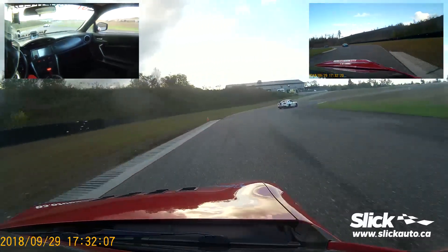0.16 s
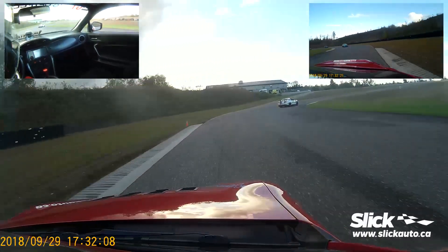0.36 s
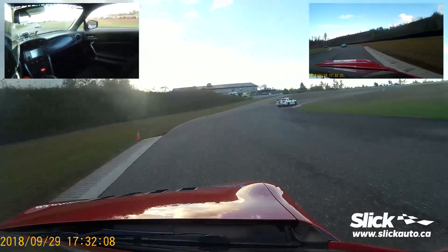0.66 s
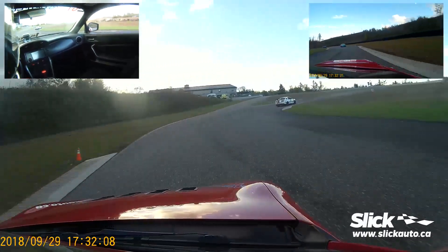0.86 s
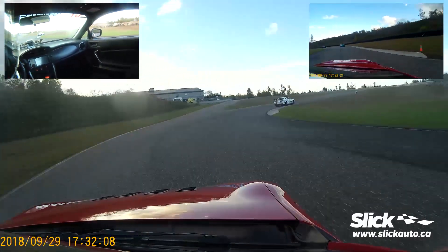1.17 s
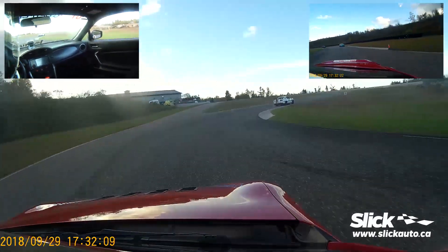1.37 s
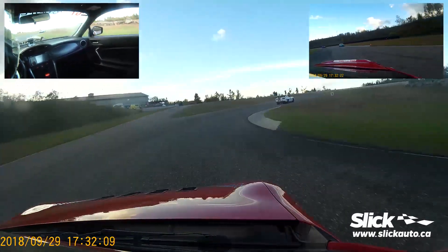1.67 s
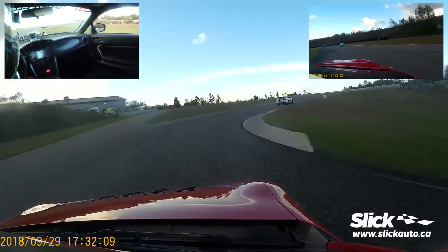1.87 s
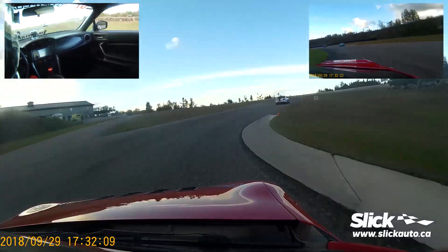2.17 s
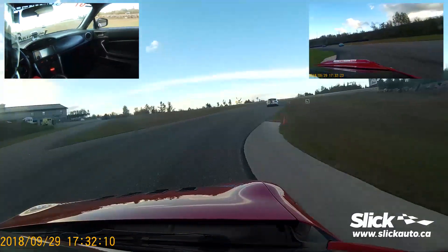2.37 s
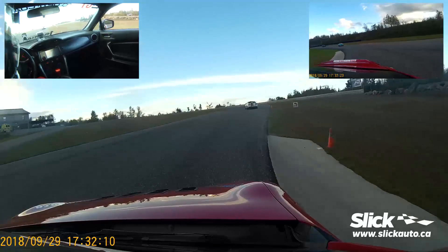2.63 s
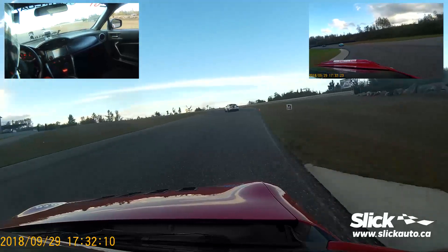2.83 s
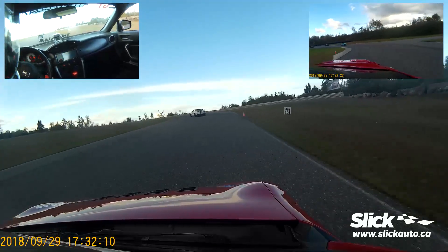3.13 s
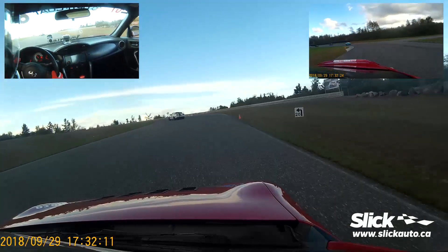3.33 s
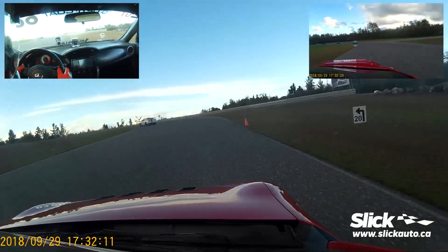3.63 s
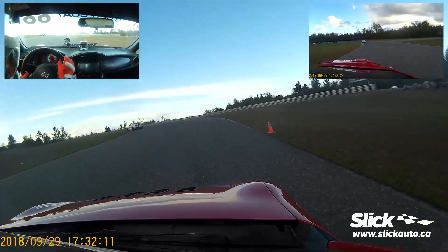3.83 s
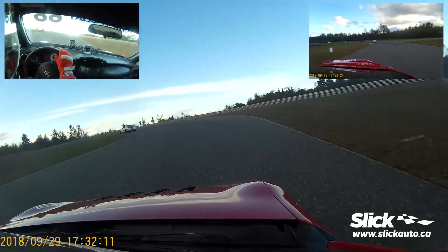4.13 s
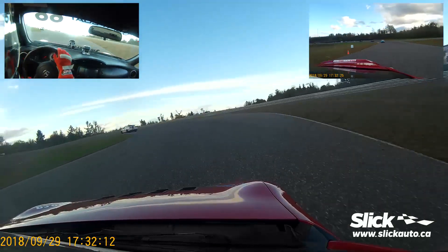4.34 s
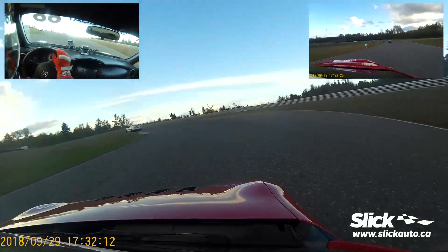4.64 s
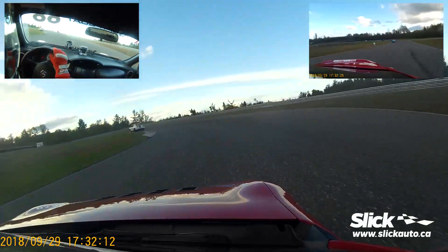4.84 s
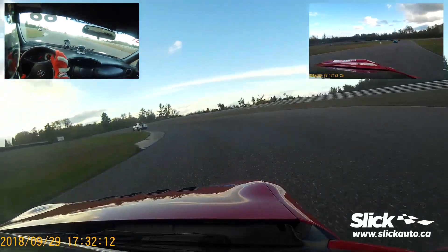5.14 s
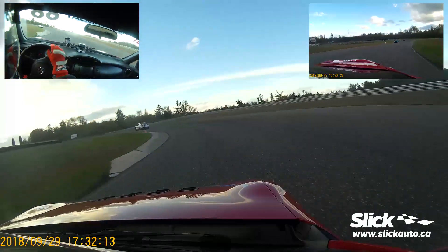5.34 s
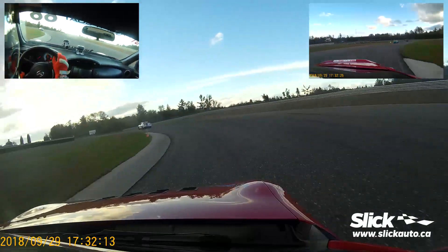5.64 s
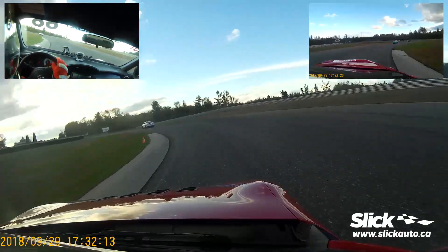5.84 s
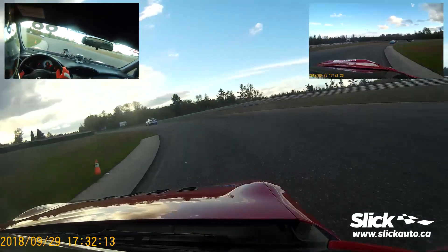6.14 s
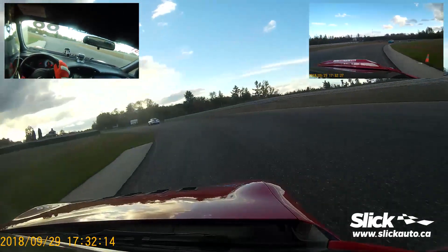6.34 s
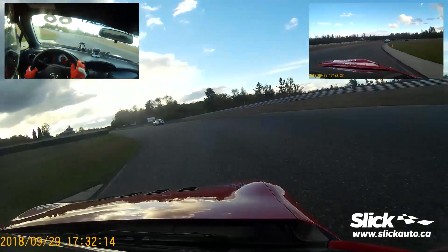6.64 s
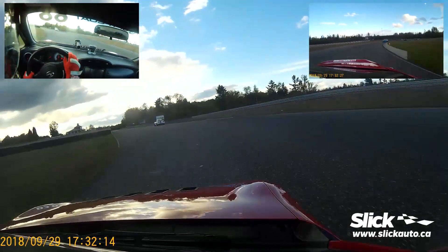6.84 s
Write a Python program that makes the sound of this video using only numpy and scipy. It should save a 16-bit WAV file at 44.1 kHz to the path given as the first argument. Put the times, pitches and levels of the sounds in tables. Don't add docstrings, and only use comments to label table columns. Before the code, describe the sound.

Inside a car lapping a circuit, a smooth six-cylinder engine booms and dips with the pedal over tyre roar, floor rumble and wind, finally pulling hard.

```python
import sys
import numpy as np
from scipy import signal
from scipy.io import wavfile
from scipy.ndimage import uniform_filter1d

SR = 44100
rng = np.random.default_rng(int(sys.argv[2]) if len(sys.argv) > 2 else 0)


def invert_db(level):
    return 10 ** (np.asarray(level, dtype=float) / 20)


def int16_out(signal):
    q = np.round(np.clip(np.atleast_2d(signal).T, -1, 1) * 32767)
    wavfile.write(sys.argv[1], SR, q.astype(np.int16))


N = 308700
T = np.arange(N) / SR
CYLINDERS = 6
LIFT_S = 0.08
# (pitch [Hz], width [Hz], level [dB])
PANEL = [(866, 26, -5.5), (1330, 40, -14)]


def evened(x):
    return x / np.sqrt(np.mean(x ** 2) + 1e-20)


def read(points, hz):
    f, value = np.transpose(points)
    return np.interp(np.log(hz + 1), np.log(f + 1), value)


def curves(rows):
    s, *columns = np.transpose(rows)
    return [np.interp(T, s, c) for c in columns]


def spells(rows, rest_db, fall_s):
    power = invert_db(rest_db) ** 2 + np.zeros(N)
    for start, end, db, rise in rows:
        shape = np.clip(np.minimum((T - start) / rise, 1 + (end - T) / fall_s), 0, 1)
        power += (invert_db(db) * shape ** 2) ** 2
    return 10 * np.log10(power)


def drift(seconds):
    steps = rng.standard_normal(N // 256 + 2)
    span = max(round(seconds * SR / 256), 1)
    smooth = uniform_filter1d(uniform_filter1d(steps, span), span)
    return np.interp(np.arange(N) / 256, np.arange(len(steps)), evened(smooth))


def resonate(x, hz, width):
    turn = np.exp(2j * np.pi * np.cumsum(hz * np.ones(N)) / SR)
    r = np.exp(-np.pi * width / SR)
    return 2 * (turn * signal.lfilter([1 - r], [1, -r], x / turn)).real


def fuzzy(hz, width):
    once = resonate(rng.standard_normal(N), hz, width)
    return evened(resonate(once, hz, width))


def noise(shape, size, patchy_db, flicker_db):
    frames, hz = 4 * N // size + 5, np.fft.rfftfreq(size, 1 / SR)
    a, b, patches = rng.standard_normal((frames, len(hz), 3)).T
    patches = evened(uniform_filter1d(uniform_filter1d(patches, 8, 0), 10, 1))
    flicker = evened(uniform_filter1d(rng.standard_normal(frames), 4))
    beyond_db = -9 * np.log2(np.maximum(hz / shape[-1][0], 1))
    spectrum_db = (read(shape, hz) + beyond_db)[:, None]
    z = (a + 1j * b) * invert_db(spectrum_db + patchy_db * patches + flicker_db * flicker)
    return evened(signal.istft(z, nperseg=size, noverlap=3 * size // 4)[1][:N])


def car_ahead():
    # (time [s], firing rate [Hz], level [dB])
    lead_car = [
        (0, 259.5, -62),
        (.55, 260, -44),
        (1.05, 274, -78.5),
        (1.5, 276, -50),
        (1.9, 275, -50.5),
        (2.5, 286.8, -48),
        (2.75, 283.7, -50),
        (3, 268, -67),
    ]
    hz, db = curves(lead_car)
    db = db - 30 * np.clip(T - lead_car[-1][0], 0, 2)
    phase = 2 * np.pi * np.cumsum(hz) / SR + 0.44 * drift(.04)
    return np.sqrt(2) * invert_db(db - 2.0 + 0.5 * drift(.05)) * np.sin(phase)


def stones():
    # (time [s], peak level [dB], length [s], lowest pitch [Hz])
    hits = [(.567, -58, .005, 2000), (1.309, -59, .01, 2000), (1.584, -57, .012, 2000),
            (1.857, -61, .006, 4000), (2.6, -63, .02, 2000), (3.618, -56, .01, 4000),
            (4.3235, -50, .006, 2200), (4.3295, -48.5, .009, 1900), (5.337, -58, .01, 3000),
            (5.64, -62, .015, 2500), (6.993, -47, .01, 2000)]
    out = np.zeros(N + SR)
    t = np.arange(4000) / SR
    for s, db, length, low_hz in hits:
        bandpass = signal.butter(1, [low_hz, 9000], "band", fs=SR)
        burst = signal.lfilter(*bandpass, rng.standard_normal(len(t)))
        fade = np.exp(-t / length) * np.minimum(t / .0008, 1)
        out[round(s * SR):][:len(t)] += invert_db(db - 7) * burst * fade
    return out[:N]


def seam_knocks():
    # (time [s], peak level [dB], pitch [Hz])
    seams = [
        (0.025, -56, 430),
        (0.112, -38.5, 800),
        (0.176, -41, 600),
        (0.243, -41, 730),
        (0.556, -31, 396),
        (1.055, -36.5, 433),
        (4.715, -40, 408.7),
    ]
    out = np.zeros(N + SR)
    t = np.arange(4000) / SR
    for s, db, hz in seams:
        out[round(s * SR):][:len(t)] -= invert_db(db - 4.5) * np.sin(2 * np.pi * hz * t) * np.exp(-t * hz / 4.4)
    return out[:N]


def alternator(cycle):
    # (start [s], end [s], level [dB], rise [s])
    whine = [
        (.8, 1.3, -93, .2),
        (1.7, 2.95, -90, .3),
        (3.4, 4.0, -94, .2),
        (3.95, 4.9, -91, .15),
        (5.8, 7.1, -87.5, .4),
    ]
    level_db = spells(whine, -98, fall_s=.3) + 4.5 + 1.6 * drift(.04)
    return invert_db(level_db) * np.sin(24.33 * CYLINDERS * cycle + .9 * drift(.012))


def intake(hz):
    # (start [s], end [s], level [dB], rise [s])
    whistle = [
        (3.45, 3.95, -86, .25),
        (5.95, 6.5, -84, 0.18),
        (6.42, 6.88, -78, 0.17),
    ]
    return invert_db(spells(whistle, -105, fall_s=.2)) * fuzzy(np.minimum(32.05 * hz, 8350), 450)


def trim_rattle(jolt):
    # (pitch [Hz], width [Hz], level [dB])
    trim = [(3360, 390, -3.5), (3700, 490, 7), (4390, 110, -2.5), (4750, 71, -6.5)]
    # (start [s], end [s], level [dB], rise [s])
    rattles = [
        (1.25, 1.9, -76, 0.21),
        (2.5, 2.7, -78, .12),
        (3.96, 4.4, -77, 0.055),
        (4.4, 5.2, -77, 0.23),
        (5.22, 5.42, -73, .08),
        (5.45, 5.62, -73.5, 0.043),
        (6.0, 7.1, -79.5, 0.18),
    ]
    size_db = 1.5 * np.minimum(rng.exponential(1, N), 4) + 1.7 * drift(.012)
    taps = invert_db(size_db) * (rng.random(N) < 6000 / SR) * rng.choice([-1, 1], N)
    ringing = np.zeros(N)
    for hz, wide, db in trim:
        ringing += invert_db(db) / np.sqrt(wide) * resonate(resonate(taps, hz, wide), hz, 1.1 * wide)
    level_db = spells(rattles, -87, fall_s=0.071) + 1.1 * jolt + 0.87 * drift(.03)
    return invert_db(level_db) * evened(ringing)


def wind(roar_db, hz, jolt):
    # (pitch [Hz], level [dB])
    hiss = [(1500, -6), (3000, -4), (5000, -3.5), (7000, -4), (8500, -4), (10000, -6), (12000, -7.5),
            (14500, -10), (16000, -12)]
    level_db = -83.5 + .6 * (roar_db + 60.5) + 0.0515 * (hz - 233)
    level_db += 0.37 * (T - 4)
    return invert_db(level_db + 6.5 + 0.68 * jolt) * noise(hiss, 256, patchy_db=.8, flicker_db=.7)


def body_thump(roar_db, jolt):
    # (pitch [Hz], level [dB per Hz])
    thump = [(4, -8.5), (14, 10), (26, 17.5), (45, 5), (70, -5), (110, -41)]
    level_db = roar_db + 8.5 + 1.9 * jolt + 0.5 * drift(0.033)
    return invert_db(level_db) * noise(thump, 2048, patchy_db=.8, flicker_db=.7)


def tyres(roar_db, jolt):
    # (pitch [Hz], level [dB])
    rumble = [(30, -8), (60, -19), (80, -3), (103, 28), (135, 0.5), (200, 6), (250, 8), (320, 1.5),
              (430, 2.5), (520, -8.5), (700, -40.5)]
    roar = [(300, 0), (500, -2), (900, -2), (1100, -2.5), (1600, -6), (2100, -13), (2400, -19),
            (3000, -19.5), (4000, -24.5), (5200, -28), (6500, -47)]
    scrub = [(250, -7), (400, 1), (500, -1), (690, 5.5), (900, -3), (1100, -10.5), (1800, -52.5)]
    # (start [s], end [s], level [dB], rise [s])
    corners = [
        (-.1, 2.76, 3.18, 0.11),
        (1.4, 2.2, 1.8, 0.33),
    ]
    out = invert_db(roar_db + 11.5 + 1.6 * jolt) * noise(rumble, 1024, patchy_db=1.0, flicker_db=.9)
    out += invert_db(roar_db + 2.0 + 1.27 * jolt) * noise(roar, 512, patchy_db=1.0, flicker_db=.9)
    scrub_db = roar_db + spells(corners, -0.98, fall_s=0.12) + 0.5 + 1.7 * jolt
    out += invert_db(scrub_db) * noise(scrub, 512, patchy_db=1.0, flicker_db=.9)
    cabin_db = roar_db + spells(corners, -4.5, fall_s=.1) + 1.5 + 1.2 * jolt
    out += invert_db(cabin_db) * fuzzy(237.7, 64)
    return out + invert_db(roar_db - 7) * fuzzy(PANEL[0][0], 60)


def drive_shaft(cycle):
    return np.sqrt(2) * invert_db(-58.5 + 0.81 * drift(0.25)) * np.sin(2.57 * cycle + 0.24 * drift(0.085))


def exhaust(cycle):
    # (start [s], end [s], level [dB], rise [s])
    blares = [
        (.68, .78, -58, 0.04),
        (3.9, 4.03, -56, 0.081),
        (5.8, 5.92, -54, 0.071),
        (6.04, 6.4, -45.5, .06),
        (6.4, 6.64, -48, .06),
    ]
    level_db = spells(blares, -66, LIFT_S) + 2.1 * drift(.05)
    return np.sqrt(2) * invert_db(level_db) * np.sin(9 * cycle + .12 * drift(.03))


def half_orders(hz, cycle, boom_db):
    # (multiple of the full cycle, level [dB])
    low_orders = [(2, -15.5), (3, -1.5), (4, 2), (5, 7.5), (7, -10.5), (8, 2), (10, -5), (11, -1.5),
                  (12, -2.5), (13, -10.5)]
    # (pitch [Hz], level [dB])
    cabin = [(550, -6.5), (750, -20), (1000, -13), (1400, -28), (2000, -28.5), (3200, -39.5)]
    load_db = -61.5 + 0.05 * np.minimum(hz - 242.5, 0) + 0.41 * (boom_db + 43)
    out = np.zeros(N)
    for k, db in low_orders:
        phase = k * cycle + 2 * np.pi * rng.random() + 0.17 * drift(0.12)
        out += invert_db(load_db + db + 0.84 * drift(0.23)) * np.sin(phase)
    slow = slice(None, None, 64)
    for k in range(14, 58):
        f = k * hz[slow] / CYLINDERS
        ring = sum(invert_db(db) / (1 + (2 * (f - f0) / w) ** 2) for f0, w, db in PANEL)
        odd_db = 4.64 * (k % 2)
        gain = (invert_db(read(cabin, f)) + ring) * invert_db(load_db[slow] + odd_db + 1.9 * drift(.1)[slow])
        out += np.interp(T, T[slow], gain) * np.sin(k * cycle + 2 * np.pi * rng.random())
    return np.sqrt(2) * out


def pedal_boom_db():
    # (start [s], end [s], firing boom level [dB], rise [s])
    throttle = [(.3, 1.2, -54.5, .2), (1.1, 1.68, -40.5, 0.43), (1.7, 1.86, -44.5, 0.052),
                (1.98, 2.15, -47.5, 0.089), (2.2, 2.72, -51.5, 0.12), (3.0, 3.6, -49, 0.48),
                (3.3, 4.21, -38, 0.59), (4.35, 4.75, -50, 0.17), (4.72, 5.4, -44, 0.054),
                (5.5, 5.8, -47.5, 0.06), (5.74, 7.1, -36.5, 0.085), (6.0, 6.67, -34, 0.19)]
    return spells(throttle, -52.5, LIFT_S)


def firing_note(cycle, boom_db):
    level_db = boom_db + 0.86 + 0.46 * drift(.04)
    return np.sqrt(2) * invert_db(level_db) * np.sin(CYLINDERS * cycle + 0.054 * drift(0.012))


def engine(hz):
    cycle = 2 * np.pi * np.cumsum(hz) / SR / CYLINDERS
    boom_db = pedal_boom_db()
    out = alternator(cycle) + intake(hz) + drive_shaft(cycle) + exhaust(cycle)
    return out + half_orders(hz, cycle, boom_db) + firing_note(cycle, boom_db)


def scene():
    # (time [s], firing rate [Hz])
    revs = [(0, 221), (.75, 230.5), (1.4, 243.5), (1.63, 243.5), (1.85, 237), (2.1, 231.7), (2.62, 225.5),
            (2.8, 232.5), (3.3, 238), (3.6, 242), (4.02, 250), (4.22, 242.5), (4.6, 238), (4.95, 239.5),
            (5.25, 233.5), (5.6, 238.5), (6.25, 251.5), (7, 267)]
    # (time [s], roar level [dB])
    tyre_load = [(0, -63), (.2, -63), (.7, -57.5), (.92, -61.5), (1.55, -56.5), (2.0, -56.5), (2.7, -58),
                 (2.9, -62.5), (3.15, -65), (3.7, -58), (3.85, -62), (4.25, -57.5), (4.5, -61),
                 (4.9, -57.5), (5.55, -58.5), (6.2, -56), (6.45, -56), (7, -56)]
    # (time [s], jolt [dB])
    bumps = [(.18, 1.7), (.57, 0.3), (.75, 1.5), (1.1, 1.2), (1.33, 2), (1.581, 1), (1.65, 1.2),
             (2.06, 0.5), (2.54, 1), (2.61, 1.5), (2.72, 0.3), (3.03, 2), (3.35, 1.8), (3.62, -0.5),
             (3.72, 0.2), (4.11, -0.1), (4.34, 1), (4.65, 1), (4.88, 2), (5.04, 1.7), (5.37, 1.2),
             (5.62, 1.5), (5.92, 1.9), (6.29, 3), (6.56, 1.7), (6.67, 3.3), (6.99, 0.5)]
    hz, = curves(revs)
    roar_db, = curves(tyre_load)
    bump_s = 0.036
    jolt = sum(db * np.exp(-((T - s) / bump_s) ** 2) for s, db in bumps) + 0.39 * drift(.02)
    out = car_ahead() + stones() + seam_knocks() + trim_rattle(jolt)
    out += wind(roar_db, hz, jolt) + body_thump(roar_db, jolt) + tyres(roar_db, jolt)
    return (out + engine(hz))[None]


def band_limit(x):
    return signal.sosfilt(signal.butter(12, 14870, fs=SR, output="sos"), x)


def record(dry):
    hz, _, z = signal.stft(dry[0], SR, nperseg=2048, noverlap=1024)
    top = np.flatnonzero(hz > 12750)
    band = (top - top[0]) // 16
    power = np.array([np.mean(abs(z[top[band == b]]) ** 2, 0) for b in range(band[-1] + 1)])
    z[top] *= (power > invert_db(-105.7) ** 2)[band]
    kept = signal.istft(z, SR, nperseg=2048, noverlap=1024)[1][None, :N]
    return band_limit(kept)


dry = scene()
out = record(dry)
int16_out(out)
```